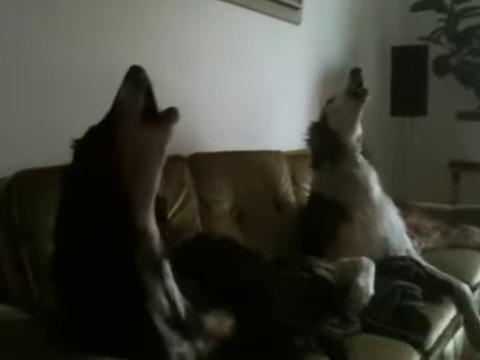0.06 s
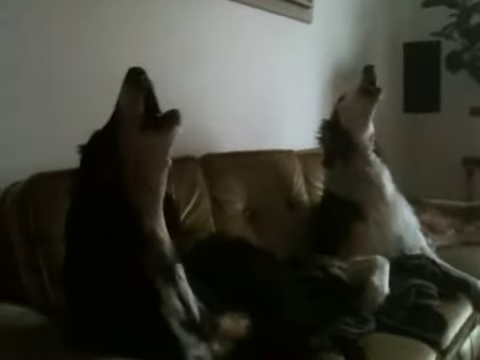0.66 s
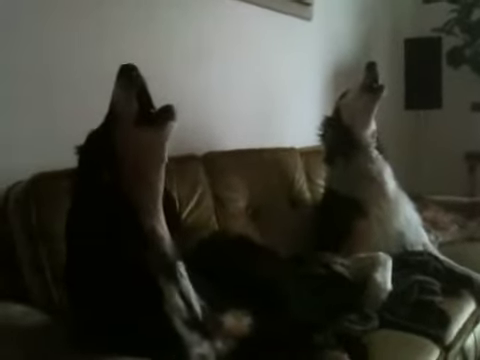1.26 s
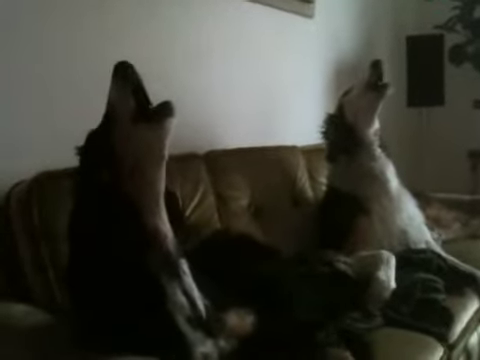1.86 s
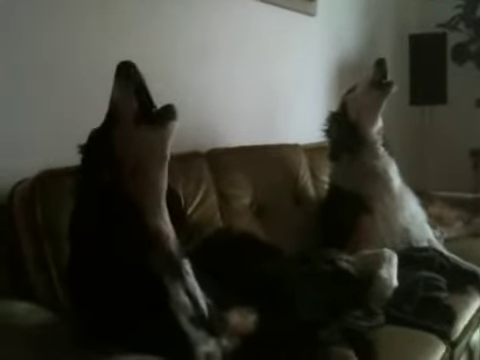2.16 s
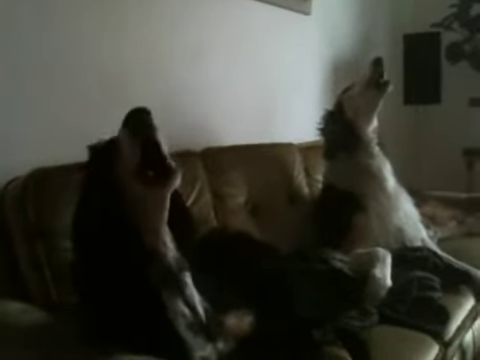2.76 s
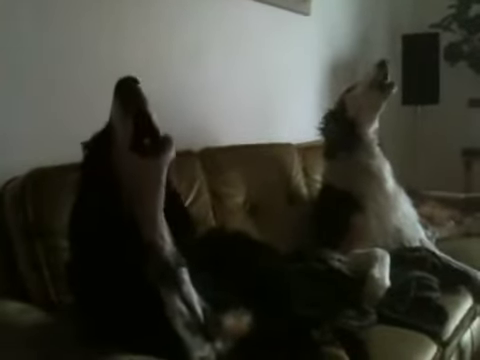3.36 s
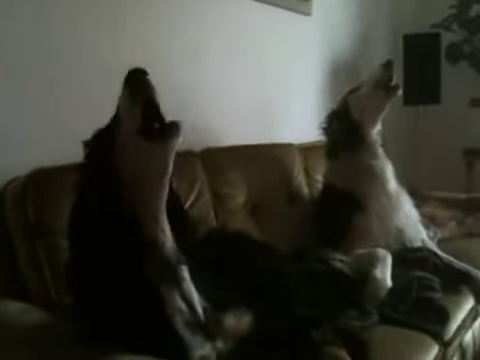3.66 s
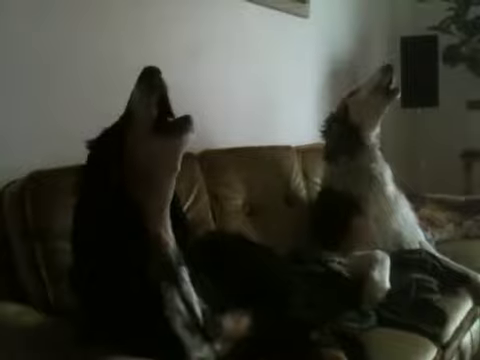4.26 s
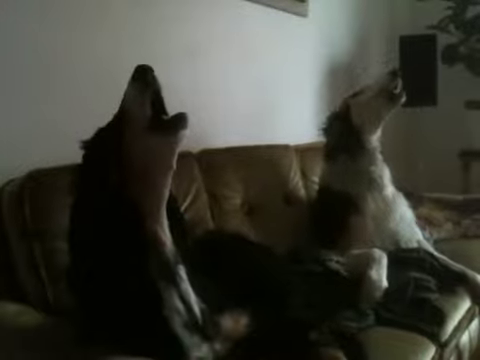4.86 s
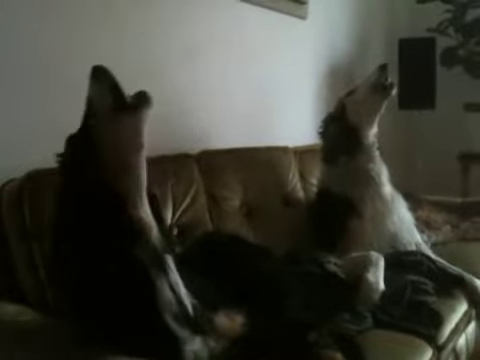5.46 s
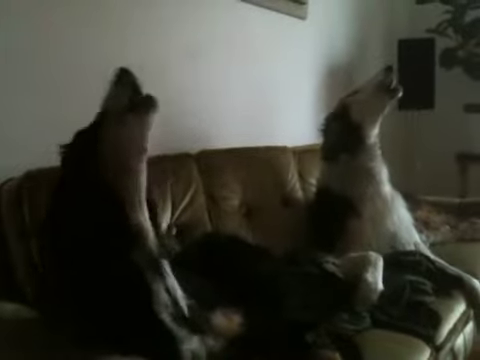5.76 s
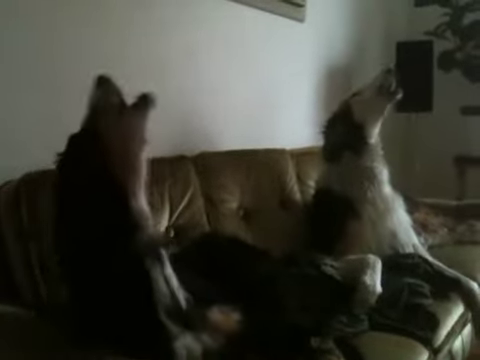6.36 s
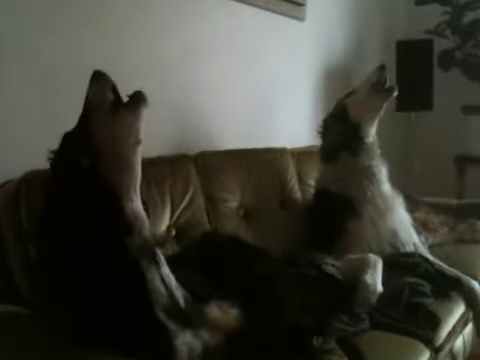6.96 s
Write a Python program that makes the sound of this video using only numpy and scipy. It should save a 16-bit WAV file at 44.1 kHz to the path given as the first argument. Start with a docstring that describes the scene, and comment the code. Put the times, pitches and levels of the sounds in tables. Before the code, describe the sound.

A big dog's loud howl and a smaller dog's thin, wavering howl overlap throughout, heard up close with light living room echo. The big voice drops to a lower pitch and jumps between registers, while the small one cracks and fades. The small dog comes back with a yelp and keeps howling as the big dog pauses for a soft gasp, then both finish on strong, long notes.

```python
"""A big dog howls in a living room: high and two-toned, then it breaks low, yodels, gasps and restarts.
A smaller dog holds a thinner, higher, fluttering note, cracks between registers, pauses and comes back
with a yelp. Each voice is vibrating vocal folds and breath, coloured by throat and muzzle.
Both sit close to a small microphone that overloads on the loudest notes."""
import sys
import numpy as np
from scipy import signal
from scipy.fft import rfft, irfft, next_fast_len
from scipy.io import wavfile

SR = 44100
rng = np.random.default_rng(int(sys.argv[2]) if len(sys.argv) > 2 else 0)


def unload_wav(signal):
    """Save mono or channel-first audio to the path in sys.argv[1] as 16-bit WAV at rate SR, clipped to [-1, 1]."""
    wavfile.write(
        sys.argv[1],
        SR,
        np.round(np.clip(np.atleast_2d(signal).T, -1, 1) * 32767).astype(np.int16),
    )


N = 309141
TIME = np.arange(N) / SR
CUTOFF_HZ = 15700


def from_db(db):
    """Decibels to gain."""
    return 10 ** (np.asarray(db) / 20)


def in_time(rows, t):
    """Each column of a breakpoint curve at the times t."""
    times, *columns = np.transpose(rows)
    return [np.interp(t, times, column) for column in columns]


def gain_at(colour, hz):
    """Gain of a spectrum at the given frequencies."""
    points_hz, db = np.transpose(colour)
    return from_db(np.interp(np.log(hz + 1e-9), np.log(points_hz), db))


def noise(colour, size, shade=None):
    """Coloured noise at unit power, then shaded by an optional second spectrum."""
    n = next_fast_len(size)
    hz = np.arange(n // 2 + 1) * SR / n
    gain = gain_at(colour, hz)
    gain = gain / np.sqrt(np.mean(gain ** 2) + 1e-20)
    if shade is not None:
        gain = gain * gain_at(shade, hz)
    return irfft(rfft(rng.standard_normal(n)) * gain, n)[:size]


def drift(rate_hz, size):
    """Random wander, mostly slower than rate_hz."""
    count = int(size / SR * rate_hz * 2) + 8
    return np.interp(np.arange(size) * rate_hz * 2 / SR, np.arange(count), rng.standard_normal(count))


def partial(gain, phase):
    """A sine with a random starting phase."""
    return gain * np.sin(phase + rng.uniform(0, 2 * np.pi))


def room_tone():
    """The faint, dark bed of a still room."""
    # spectrum of the bed: freq_hz, gain_db
    colour = [(30, -13.5), (90, -7.5), (190, 6.5), (300, 2), (1000, -9), (4000, -17.5), (15000, -24)]
    return from_db(-72) * noise(colour, N)


def room(x, wet_db, t60_s=0.7):
    """Dense reflections die away behind a voice, so every glide beats with its own echo."""
    t = TIME[:SR]
    # spectrum of the tail: freq_hz, gain_db
    colour = [(100, -16), (450, 0.5), (2000, -0.5), (6000, -0.5), (15000, -6)]
    tail = noise(colour, SR) * from_db(-60 * t / t60_s) * (t > .008)
    return x + from_db(wet_db) * signal.fftconvolve(x, tail / np.sqrt(np.sum(tail ** 2)))[:N]


def voicing(curve, fade_s):
    """A note's samples and its soft gate; notes at either end of the scene are held open there."""
    start = curve[0][0] if curve[0][0] > .1 else -1
    end = curve[-1][0] if curve[-1][0] < 6.9 else 8
    gate = np.clip(np.minimum(TIME - start, end - TIME) / fade_s + .5, 0, 1)
    on = gate > 0
    return on, np.sin(np.pi / 2 * gate[on]) ** 2


def fold_phase(pitch, jitter):
    """Phase of vibrating folds, with a small tremor and faster jitter."""
    unsteady = 0.002 * drift(18, len(pitch)) + jitter * drift(160, len(pitch))
    return 2 * np.pi * np.cumsum(pitch * (1 + unsteady)) / SR


def swaying(fundamental_db, overtones_db, timbre_db, sway_db):
    """Levels of the low harmonics, each swelling and fading on its own."""
    levels = [fundamental_db] + [overtones_db + db for db in timbre_db]
    return [db + sway_db * drift(7, len(db)) for db in levels]


def voice(phase, pitch, harmonics_db, ring_db, throat, hiss, air_db, flicker_db=4.5):
    """Strong low harmonics, flickering upper ones shaped by the throat, pulsed hiss and breath."""
    # the fold pulses blur towards the top, harmonics giving way to hiss: freq_hz, gain_db
    clear_share = [(6000, -4), (9000, -4.5), (15000, -12)]
    hiss_share = [(200, -38.5), (2000, 0.5), (4000, 1), (5200, 1), (7500, 8.5), (12000, 12.5)]
    # air rushing through an open throat: freq_hz, gain_db
    air_colour = [(100, -57.5), (280, -27.5), (430, -7), (650, -9), (900, -1.5), (1600, -5.5),
                  (2200, -17.5), (3500, -44), (5200, -24), (15000, -49)]
    size = len(phase)
    low = sum(partial(from_db(db), k * phase) for k, db in enumerate(harmonics_db, 1))
    upper, coarse = 0, np.arange(0, size, 64)
    for k in range(len(harmonics_db) + 1, int(CUTOFF_HZ / pitch.mean())):
        hz = k * pitch[coarse]
        flicker = from_db(flicker_db * drift(14, size)[coarse])
        gain = gain_at(throat, hz) * gain_at(clear_share, hz) * flicker
        upper = upper + partial(np.interp(np.arange(size), coarse, gain), k * phase)
    # power of the harmonics inside the bright ring, 4700-5900 Hz
    ring_power = np.mean(gain_at(throat, np.linspace(4700, 5900, 20)) ** 2) * 1200 / pitch
    puffs = (1 + np.sin(phase)) * noise([(200, -42.5)] + list(throat), size, hiss_share)
    upper = upper / np.sqrt(ring_power) + hiss * puffs
    effort = np.sqrt(sum(from_db(db) ** 2 for db in harmonics_db))
    air = from_db(air_db) * effort * noise(air_colour, size)
    return np.sqrt(2) * (low + from_db(ring_db) * upper) + air


def cracked(pitch, t, slide_s=0.065, return_s=0.025, catch_db=6):
    """The small dog's voice slides down a register and springs back, catching half way."""
    # register cracks: start_s, end_s, pitch_hz, boost_db
    cracks = [(1.9, 2.141, 409, 7), (2.293, 2.421, 410.8, 6.5), (2.549, 2.706, 406, 8.5),
              (3.189, 3.33, 455, 5)]
    louder_db = 0
    for start, end, low_hz, boost_db in cracks:
        dropped = np.clip(np.minimum((t - start) / slide_s, (end - t) / return_s) + .5, 0, 1)
        pitch = pitch + dropped * (low_hz - pitch)
        louder_db = louder_db + dropped * boost_db - catch_db * np.sin(np.pi * dropped)
    return pitch, louder_db


def small_note(curve, timbre_db, level_db, jitter, hiss, air_db, sway_db):
    """One note of the small dog; its flutter puts a sideband either side of each harmonic."""
    # flutter of the folds: time_s, rate_hz, depth_db
    flutter_curve = [(0, 85.85, 1), (1.2, 100, -15.5), (1.5, 104.5, -10), (1.8, 103.4, -13.5),
                     (2, 99.9, -36.5), (4.4, 110, -34.5), (5.35, 126.9, -30), (5.6, 124.7, -29),
                     (5.72, 119.8, -6.5), (6.05, 118.4, -3), (6.5, 103.3, -3.5), (7.01, 100.6, -10.5)]
    # bright ring of the voice: time_s, level_db
    ring = [(0, -48.5), (1.2, -63), (4.4, -74), (5, -48.5), (5.3, -55.5), (5.6, -56), (6.05, -54),
            (6.5, -52), (7.01, -52)]
    # upper resonances of throat and muzzle: freq_hz, gain_db
    throat = [(2000, 7), (2700, -2), (3500, -15), (4300, -14), (4800, -15), (5400, 1.5), (6300, -20),
              (8400, -16.5), (9500, -28), (15000, -32)]
    on, gate = voicing(curve, fade_s=.03)
    pitch, fundamental_db, overtones_db = in_time(curve, TIME[on])
    waver = 1 + 0.005 * drift(9, len(pitch))
    pitch, louder_db = cracked(pitch * waver, TIME[on])
    harmonics_db = swaying(fundamental_db, overtones_db, timbre_db, sway_db)
    flutter_hz, depth_db = in_time(flutter_curve, TIME[on])
    ring_db, = in_time(ring, TIME[on])
    note = voice(fold_phase(pitch, jitter), pitch, harmonics_db, ring_db, throat, hiss, air_db)
    flutter = 1 + from_db(depth_db) * np.sin(fold_phase(flutter_hz, jitter=0.028))
    out = np.zeros(N)
    out[on] = from_db(level_db + louder_db) * gate * flutter * note
    return out


def small_dog():
    """A long thin howl, a yelp, a moan and a closing howl, as (stem, reverb send in dB) pairs."""
    # note contours: time_s, pitch_hz, fundamental_db, overtones_db
    thin_curve = [(0.0, 578.6, -26, -19.5), (0.37, 566.5, -31, -29), (0.9, 546, -29, -28),
                  (1.22, 524, -31.5, -31), (1.4, 519, -30, -32.5), (1.6, 548, -36.5, -32),
                  (1.8, 526, -35, -35.5), (1.88, 498.2, -31, -32), (2.2, 503.3, -33, -34),
                  (2.8, 501, -33.5, -37), (2.9, 474, -39.5, -44), (3.02, 503.4, -29, -34),
                  (3.45, 528.3, -31.5, -40.5), (3.68, 518, -42.5, -48), (3.84, 536, -32.5, -30),
                  (4.14, 562.3, -36.5, -40.5), (4.28, 531, -37, -40.5), (4.45, 511, -46.5, -57.5)]
    yelp_curve = [(4.97, 564, -36, -37.5), (5.025, 650.3, -13.5, -15.5), (5.05, 668, -7.5, -8.5),
                  (5.075, 666.7, -13.5, -12.5), (5.098, 671.6, -23.5, -27.5), (5.12, 641.4, -18, -10.5),
                  (5.15, 611, -21.5, -25), (5.2, 547.5, -29, -31), (5.31, 535, -28.5, -36)]
    moan_curve = [(5.29, 529, -16, -27), (5.33, 530.4, -16, -37), (5.4, 525.5, -28, -32),
                  (5.47, 540, -18.5, -23), (5.57, 522, -19, -37.5), (5.62, 522, -31, -41)]
    last_curve = [(5.62, 527.7, -47, -24), (5.69, 546.6, -22, -23), (5.8, 545, -34.5, -29.5),
                  (5.9, 540, -26, -26), (6.09, 516.4, -27.5, -32.5), (6.3, 531.3, -25, -24),
                  (6.46, 540.3, -19, -26.5), (6.66, 546.3, -22.5, -23), (7.01, 544, -23, -25)]
    # timbres against the overtone level: harmonic_2_db, harmonic_3_db
    thin_timbre = (0, -19)
    yelp_timbre = (0, -12)
    moan_timbre = (0, -3)
    last_timbre = (-1.1, -20)
    thin = small_note(thin_curve, thin_timbre, level_db=0, jitter=.0041, hiss=.24, air_db=-32, sway_db=2)
    yelp = small_note(yelp_curve, yelp_timbre, level_db=0, jitter=.006, hiss=.8, air_db=-31, sway_db=.5)
    moan = small_note(moan_curve, moan_timbre, level_db=-.97, jitter=.005, hiss=.38,
                      air_db=-33.5, sway_db=1.5)
    last = small_note(last_curve, last_timbre, level_db=-1.34, jitter=.0058, hiss=.39,
                      air_db=-31.5, sway_db=2)
    return [(thin + moan + last, -5.5), (yelp, -6)]


def gasp():
    """The big dog pulls in air through its open mouth before its last howl."""
    # swell of the breath: time_s, level_db
    swell = [(5.68, -85), (5.82, -47), (6, -38), (6.1, -43), (6.16, -82)]
    # spectrum of the breath: freq_hz, gain_db
    colour = [(80, -36), (140, 7), (230, -21), (500, 7), (1200, 4), (2200, -0.5), (3000, -7), (4000, -22),
              (9000, -30), (15000, -42)]
    level_db, = in_time(swell, TIME)
    return from_db(level_db) * noise(colour, N) * (TIME > swell[0][0]) * (TIME < swell[-1][0])


def beamed(x, from_hz=3940):
    """The treble grows while the big dog's open mouth points at the microphone."""
    # treble lift as the head turns: time_s, gain_db
    facing = [(2.33, -3), (2.45, 7), (2.7, 1.5), (2.88, 8), (3.05, 6), (3.15, 2), (3.5, 2)]
    gain_db, = in_time(facing, TIME)
    treble = signal.sosfiltfilt(signal.butter(6, from_hz, "high", fs=SR, output="sos"), x + 1e-18)
    return x + (from_db(gain_db) - 1) * treble


def second_tone(curve, t, phase, level_db):
    """An independent tone in the big dog's voice, with the sum and difference tones of the pair."""
    # the tone and its sidebands: pitch_multiple, second_tone_multiple
    mixes = [(0, 1), (3, -1), (-2, 2), (1, 1), (5, -1), (2, 1), (-1, 1)]
    # strength of each of those: gain_db
    mix_db = [1, -6, -12, -13.5, -13, -23.5, -19]
    tone_hz, tone_db = in_time(curve, t)
    tone_phase = fold_phase(tone_hz, jitter=0.0049)
    mixed = sum(partial(from_db(db), a * phase + b * tone_phase) for (a, b), db in zip(mixes, mix_db))
    return np.sqrt(2) * from_db(tone_db + level_db) * mixed


def big_note(curve, timbre_db, throat, level_db, bright_db, jitter, hiss, air_db, sway_db,
             second=None, second_db=0):
    """One register of the big dog; a narrow mouth resonance lifts low harmonics sliding through it."""
    # bright ring near 5 kHz: time_s, level_db
    ring = [(0, -49.5), (0.5, -37.5), (0.8, -42.5), (1.1, -49.5), (1.35, -45), (1.6, -46), (1.9, -46),
            (2.3, -48.5), (2.6, -47.5), (3.3, -50), (4.18, -47.5), (4.3, -51), (4.58, -59.5), (4.8, -49.5),
            (5.3, -52.5), (6.15, -52.5), (6.35, -30), (6.55, -48.5), (7.01, -48)]
    mouth_hz, width_hz, lift_db = 1177, 40, 11.5
    on, gate = voicing(curve, fade_s=.025)
    pitch, fundamental_db, overtones_db = in_time(curve, TIME[on])
    harmonics_db = swaying(fundamental_db, overtones_db, timbre_db, sway_db)
    harmonics_db = [db + lift_db / (1 + ((k * pitch - mouth_hz) / width_hz) ** 2)
                    for k, db in enumerate(harmonics_db, 1)]
    ring_db, = in_time(ring, TIME[on])
    phase = fold_phase(pitch, jitter)
    note = from_db(level_db) * voice(phase, pitch, harmonics_db, ring_db + bright_db, throat, hiss, air_db)
    if second is not None:
        note = note + second_tone(second, TIME[on], phase, second_db)
    out = np.zeros(N)
    out[on] = gate * note
    return out


def big_dog():
    """The lead howl breaks from register to register, as (stem, reverb send in dB) pairs."""
    # register contours: time_s, pitch_hz, fundamental_db, overtones_db
    high_curve = [(0.0, 502.2, -13.5, -31.5), (0.09, 490.4, -20, -29), (0.16, 482.7, -10, -30.5),
                  (0.23, 483.5, -6.5, -25), (0.5, 480.8, -5.5, -22.5), (0.65, 475.8, -8, -26.5),
                  (0.96, 481.6, -7, -22.5), (1.12, 474.2, -7.5, -24), (1.19, 465, -19, -33)]
    low_curve = [(1.15, 370, -30.5, -19), (1.2, 370.8, -28, -17.5), (1.38, 377.2, -25.5, -12.5),
                 (1.57, 366.2, -29.5, -19), (1.7, 386.4, -21, -18.5), (1.96, 402.5, -29, -19),
                 (2.12, 396.6, -27, -17), (2.3, 400.5, -34, -23), (2.46, 388.8, -22, -22.5),
                 (2.63, 390.2, -21.5, -20.5), (2.75, 363.7, -31, -21), (2.84, 365.7, -27, -22),
                 (3.05, 389.7, -24.5, -21.5), (3.17, 393.6, -26.5, -27), (3.25, 402.2, -42, -19),
                 (3.41, 406.5, -25.5, -20)]
    yodel_curve = [(3.39, 423.3, -30, -27), (3.43, 468, -26, -12.5), (3.48, 477.4, -12.5, -16.5),
                   (3.52, 469, -13.5, -18), (3.55, 466.4, -22, -26)]
    middle_curve = [(3.53, 441, -26, -22), (3.58, 439.6, -30, -19), (3.68, 435.4, -16.5, -23.5),
                    (3.87, 432.7, -21, -24), (3.99, 432, -21.5, -30.5), (4.06, 426, -23.5, -18.5),
                    (4.16, 426, -21.5, -22.5), (4.25, 435.6, -20, -29), (4.39, 431.5, -20, -24.5),
                    (4.55, 438.7, -20, -31), (4.68, 426.6, -24.5, -26), (4.78, 421.6, -25.5, -22),
                    (4.91, 440.7, -21, -23.5), (5.02, 453, -36, -24), (5.1, 450.4, -34.5, -25.5),
                    (5.21, 441.4, -30, -21), (5.29, 454.8, -32.5, -15), (5.36, 465.7, -24.5, -28)]
    cry_curve = [(6.11, 433, -21, -24), (6.14, 412.4, -26.5, -14.5), (6.17, 393.7, -29.5, -14),
                 (6.205, 408.8, -36, -18.5), (6.23, 416.5, -31, -10), (6.26, 440.4, -11.5, -14.5)]
    last_curve = [(6.25, 535, -10, -30), (6.32, 527.6, -20, -28), (6.36, 524.8, -7.5, -24),
                  (6.43, 519.5, -9, -26.5), (6.55, 505.3, -15.5, -22), (6.66, 494.5, -14, -26),
                  (6.78, 489, -17, -24.5), (7.01, 485.5, -14, -25.5)]
    # second tone of the two high howls: time_s, pitch_hz, level_db
    high_second = [(0.0, 922.5, -16.5), (0.16, 898, -17.5), (0.3, 883, -32.5), (0.62, 863, -37.5),
                   (0.85, 875, -25), (1.04, 871, -41.5), (1.16, 858, -22.5)]
    last_second = [(6.25, 931, -28), (6.29, 965.5, -9), (6.39, 957, -21.5), (6.48, 940, -20),
                   (6.57, 923, -19.5), (6.79, 909.5, -19.5), (7.01, 898.4, -16)]
    # timbres against the overtone level: harmonic_2_db, harmonic_3_db, harmonic_4_db
    high_timbre = (1.5, -6, -9)
    low_timbre = (-3.5, -15.5, -7)
    yodel_timbre = (0, -15, -19)
    middle_timbre = (-0.41, -15, -8)
    cry_timbre = (0, -12.5, -4.4)
    last_timbre = (-18, 0, -24.5)
    # upper resonances of the throat, plain, pressed hard and widened: freq_hz, gain_db
    plain_throat = [(1950, 21), (2150, 1.5), (2400, 7), (2620, 10), (2730, -3.5), (3150, -6.5),
                    (3500, -26.5), (4000, -10), (4450, -22), (4900, 14.5), (5400, 2), (6400, -20.5),
                    (7300, -6.5), (8600, -19), (11300, -16.5), (15000, -21)]
    pressed_throat = [(1950, 18), (2400, 14), (2900, 16), (3400, 6.5), (4000, 4), (4500, 1.5), (5300, 4.5),
                      (6400, -7), (7500, -7.5), (10000, -15.5), (15000, -23.5)]
    wide_throat = [(1950, 20), (2150, 0), (2400, 11.5), (2620, -5), (2800, 0.5), (3000, -4.5), (3190, -3),
                   (3450, -26), (4000, -6.5), (4550, -19), (4900, 13), (5400, 0), (6400, -10.5),
                   (7300, -4.5), (8600, -19), (11300, -12), (15000, -20)]
    high = big_note(high_curve, high_timbre, pressed_throat, level_db=.2, bright_db=-6,
                    jitter=.002, hiss=1.62, air_db=-24.5, sway_db=0, second=high_second, second_db=1.5)
    low = big_note(low_curve, low_timbre, wide_throat, level_db=0, bright_db=-.6,
                   jitter=.0013, hiss=.19, air_db=-32.5, sway_db=2)
    yodel = big_note(yodel_curve, yodel_timbre, plain_throat, level_db=-.3, bright_db=-.5,
                     jitter=.0037, hiss=.43, air_db=-36.5, sway_db=1)
    middle = big_note(middle_curve, middle_timbre, plain_throat, level_db=.5, bright_db=-.9,
                      jitter=.0014, hiss=.083, air_db=-37.5, sway_db=1.8)
    cry = big_note(cry_curve, cry_timbre, pressed_throat, level_db=2.2, bright_db=-3,
                   jitter=.009, hiss=1.3, air_db=-13.5, sway_db=1.5)
    last = big_note(last_curve, last_timbre, plain_throat, level_db=.33, bright_db=-8,
                    jitter=.0036, hiss=.8, air_db=-18.5, sway_db=1, second=last_second, second_db=.66)
    return [(high + last, -14.5), (cry, -4.5), (beamed(low) + yodel, -7), (middle, -8.5)]


def scene():
    """Both dogs and their reflections over quiet room tone, in mono."""
    dogs = sum(room(stem, wet_db) for stem, wet_db in big_dog() + small_dog())
    # a muzzle radiates next to nothing below the lowest note
    dogs = signal.sosfilt(signal.butter(3, 230, "high", fs=SR, output="sos"), dogs)
    fade_in = np.minimum(TIME / 0.00088, 1)
    return (dogs * fade_in + gasp() + room_tone())[None]


def record(dry):
    """The input stage flattens the loudest peaks; deep rumble and the top are cut."""
    ceiling, hardness = .7, 40
    clipped = dry / (1 + np.abs(dry / ceiling) ** hardness) ** (1 / hardness)
    coupled = signal.sosfilt(signal.butter(1, 25, "high", fs=SR, output="sos"), clipped)
    return signal.sosfilt(signal.cheby2(14, 70, CUTOFF_HZ + 900, fs=SR, output="sos"), coupled)


dry = scene()
out = record(dry)
unload_wav(out)
```